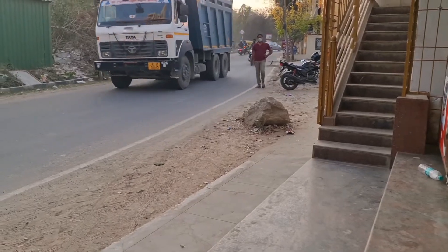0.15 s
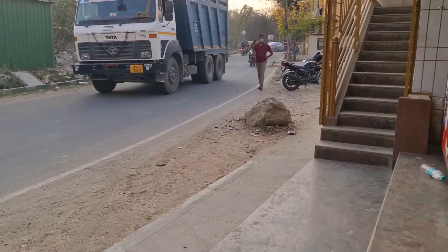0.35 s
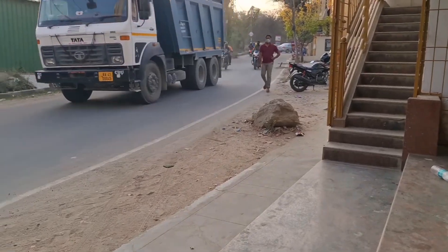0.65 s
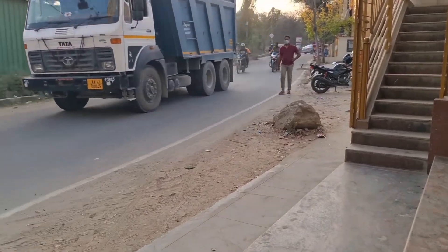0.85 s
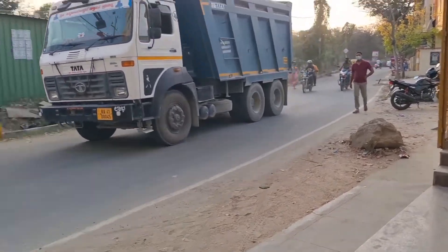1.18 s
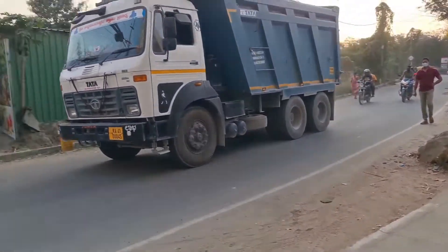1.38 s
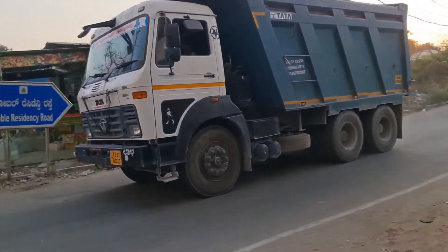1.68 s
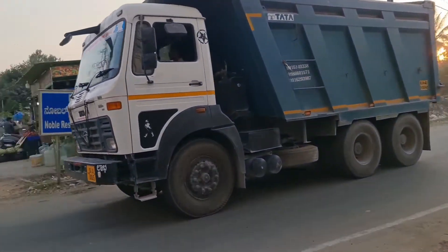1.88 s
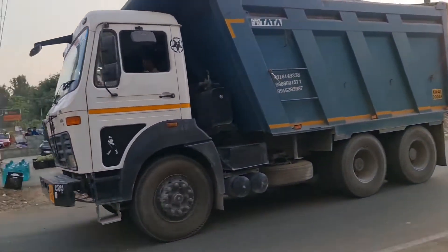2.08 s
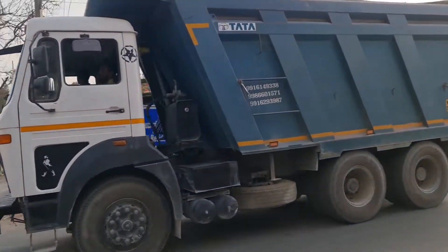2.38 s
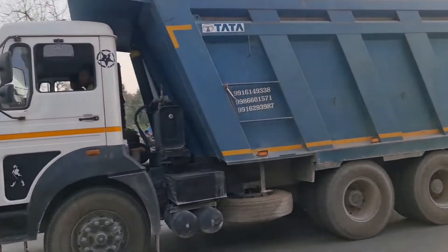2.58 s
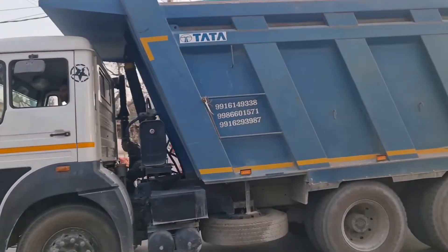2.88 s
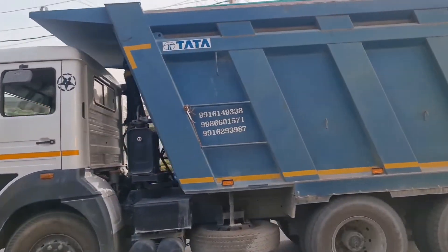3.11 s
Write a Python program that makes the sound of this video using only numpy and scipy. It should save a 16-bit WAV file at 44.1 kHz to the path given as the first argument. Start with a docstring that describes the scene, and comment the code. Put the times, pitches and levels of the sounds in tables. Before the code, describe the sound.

A heavy diesel truck rumbles and clatters over steady traffic, with faint chassis squeaks and a brief distant horn at the start. Air puffs at about 0.3 seconds, and the truck gives one short toot at 0.7. As the engine slows, the brakes rub and whistle thinly, then squeal in loud, wavering, echoing swells from 1.3 seconds until the end, just past 3. A faint gear whine joins around 2.2.

```python
"""A diesel tipper truck rolls up along a busy road, its firings booming and clattering over the traffic.
The chassis squeaks, a far horn sounds and a valve lets out a puff of air. The truck comes off the
throttle and the two diaphragms of its horn give one short toot. As it slows, the brake linings rub and
whistle thinly; then stick-slip friction sets the drums squealing in long wavering swells, which the
house fronts reflect. A faint whine from the drive joins in towards the end."""
import sys
import numpy as np
from scipy import signal
from scipy.fft import rfft, irfft, next_fast_len
from scipy.io import wavfile
from scipy.ndimage import map_coordinates

SR = 44100
rng = np.random.default_rng(int(sys.argv[2]) if len(sys.argv) > 2 else 0)


def inscribe(sig):
    """Save sig as 16-bit PCM at rate SR to the path in sys.argv[1].

    A 1-D sig is mono; a 2-D sig holds one channel per row.
    Samples are clipped to [-1, 1] before scaling.
    """
    pcm = np.round(np.clip(np.atleast_2d(sig).T, -1, 1) * 32767)
    wavfile.write(sys.argv[1], SR, pcm.astype(np.int16))


N = 143325

# Engine speed. Each row: time in seconds, firing rate in Hz.
FIRING_RATE = [(0, 80), (.25, 79.47), (.5, 85), (.68, 84.1), (1.25, 79.74), (1.6, 75.66), (2.0, 72.85),
               (2.5, 65.44), (2.9, 62.36), (3.25, 59.6)]
# Exhaust boom. Each row: multiple of the firing rate, relative level in dB.
BOOM_ORDERS = [(.5, -28), (1, -1.5), (1.5, -11), (2, -12), (3, -14), (4, -24)]
# Exhaust boom, engine body and diesel clatter. Each row: time in seconds, relative level in dB.
BOOM_LEVEL = [(0, -16.5), (.1, -18), (.22, -31.5), (.3, -22.5), (.39, -25.5), (.49, -23), (.66, -21.5),
              (.72, -41), (.92, -35), (.98, -27), (1.07, -37), (1.26, -25), (1.4, -40), (1.47, -33.5),
              (1.63, -28.5), (1.75, -24.5), (1.86, -28), (2.0, -21), (2.1, -27), (2.28, -27.5), (2.43, -30),
              (2.53, -23.5), (2.66, -25.5), (2.81, -26.5), (2.89, -21), (3.05, -27), (3.15, -30.5),
              (3.25, -26)]
BODY_LEVEL = [(0, -27), (.22, -27), (.32, -25), (.6, -25.5), (.74, -38), (1.1, -33.5), (1.65, -32.5),
              (2.1, -33), (2.5, -31), (2.9, -31), (3.25, -31.5)]
CLATTER_LEVEL = [(0, -24), (.25, -28), (.5, -29), (.68, -26), (.95, -38.5), (1.3, -31), (1.7, -34),
                 (2.0, -30), (2.2, -36), (2.6, -37), (3.25, -37.5)]
# Noise of the engine body, clatter and traffic. Each row: frequency in Hz, relative level in dB.
BODY_SPECTRUM = [(20, -32), (32, -11), (48, -1), (70, 0), (125, 0), (240, -5), (350, -11.5), (520, -15.5),
                 (900, -49)]
CLATTER_SPECTRUM = [(210, -8), (350, -0.5), (402, -15), (734, -5.5), (1170, -9), (1260, -9.5), (1640, -9.5),
                    (2680, -11.5), (4680, -19.5), (4900, -19.5), (7100, -22), (8810, -52), (14000, -42)]
TRAFFIC_SPECTRUM = [(22, -14), (55, 0.5), (200, -10.5), (500, -13.5), (800, -8.5), (1500, -11), (4000, -43),
                    (10000, -27.5), (16000, -50)]
# Chassis squeaks and the far horn. Each row: start and release in seconds, pitch in Hz, level in dB.
SQUEAKS = [(0, .09, 10750, -50), (.04, .15, 4600, -45), (.59, .67, 4570, -42)]
FAR_HORN = (.07, .18, 376, -30)
# Escaping air. One row: start and release in seconds, level in dB.
PUFF = (0.332, 0.5, -28)
# Hiss of air. Each row: frequency in Hz, relative level in dB.
AIR_SPECTRUM = [(400, -7), (1200, 5.5), (1800, 1), (3000, 1), (5000, -4), (8000, -6), (12000, -19.5),
                (16000, -33)]
# Horn diaphragms. Each row: pitch in Hz, relative level in dB.
HORN_NOTES = [(346, -21.5), (419, -24.5)]
# The horn's steady colour and opening overshoot. Each row: frequency in Hz, gain in dB.
HORN_COLOUR = [(340, -1.5), (700, -5), (850, 0), (1050, -2.5), (1260, 0), (1400, -10), (1720, -2),
               (2100, -12), (2500, -11), (3000, -9), (4200, -21), (5500, -12.5), (7400, -12.5),
               (9000, -25.5), (12000, -18.5), (16000, -37)]
HORN_BARK = [(700, -21), (1000, 9), (1350, 8.5), (1800, -12), (3000, -4), (4200, -8), (5500, -32)]
# Rise and 60 dB decay of the horn's partials. Each row: frequency in Hz, duration in seconds.
HORN_ATTACK = [(340, .06), (430, .055), (700, .022), (1200, .013), (3000, .013), (7000, .028)]
HORN_T60 = [(340, 0.38), (430, 0.26), (700, 0.087), (1700, 0.28), (3000, 0.095), (12000, 0.12)]
# Rub and whistle of the linings. Each row: time in seconds, relative level in dB.
RUB_LEVEL = [(0, -76), (.7, -49), (.82, -37.5), (.95, -41), (1.0, -48), (1.08, -38.5), (1.17, -41),
             (1.23, -50), (1.4, -36), (1.56, -45), (1.6, -34), (1.92, -35), (2.15, -49), (2.35, -43),
             (2.9, -58), (3.25, -48)]
WHISTLE_LEVEL = [(0.98, -62), (1.04, -45), (1.23, -43.5), (1.42, -49), (1.54, -41), (1.57, -51),
                 (1.85, -32.5), (1.88, -62), (1.98, -47), (2.06, -36.5), (2.35, -42), (2.41, -34.5),
                 (2.91, -34.5), (2.98, -29.5), (3.0, -35.5), (3.16, -48), (3.23, -33), (3.25, -45)]
# The linings' rub, sizzle and whistling modes. Each row: frequency in Hz, relative level in dB.
RUB_SPECTRUM = [(1000, -6), (2500, -3), (4000, -2), (6500, -1), (8500, -9), (10200, -15.5), (12000, -9),
                (16000, -43)]
SIZZLE_SPECTRUM = [(9000, -21), (13000, -18), (14400, 1), (15400, -5), (16000, -5)]
WHISTLE_MODES = [(11730, -13.5), (13200, -6), (14420, -0.5), (14750, -8), (15600, -2)]
# Drum squeal. Each row: time in seconds, pitch in Hz.
SQUEAL_PITCH = [(1.05, 1280), (1.25, 1282), (1.33, 1284), (1.39, 1238), (1.55, 1250), (1.66, 1236),
                (1.73, 1207), (1.79, 1208), (1.812, 1319), (1.84, 1273), (1.9, 1197), (1.98, 1166),
                (2.05, 1215), (2.11, 1184), (2.21, 1245), (2.255, 1196), (2.33, 1194), (2.405, 1235),
                (2.44, 1298), (2.55, 1278), (2.65, 1201), (2.72, 1177), (2.78, 1178), (2.83, 1265),
                (2.99, 1260), (3.025, 1217), (3.055, 1195), (3.15, 1200), (3.25, 1282)]
# Its swells. Each row: time in seconds, relative levels in dB of fundamental, octave and overtones.
SQUEAL_LEVELS = [(1.04, -39, -56, -59), (1.09, -35, -59, -59), (1.14, -29.5, -36, -70),
                 (1.17, -34, -45, -35), (1.21, -34, -69, -63), (1.24, -31.5, -42, -52),
                 (1.29, -18.5, -39.5, -38.5), (1.4, -15, -19.5, -31), (1.51, -31.5, -50, -35),
                 (1.53, -21.5, -29, -36.5), (1.57, -34, -43, -40.5), (1.69, -16, -23, -32),
                 (1.72, -18, -60, -38), (1.75, -16.5, -18.5, -28), (1.79, -20, -38.5, -40),
                 (1.85, -18, -23, -28.5), (2.0, -19, -36, -36), (2.04, -23, -25, -32),
                 (2.13, -44, -95, -70), (2.17, -38.5, -41, -61), (2.21, -36, -93, -37),
                 (2.22, -37.5, -40, -61), (2.24, -16.5, -21.5, -32), (2.39, -15, -26, -32),
                 (2.42, -18.5, -47, -35.5), (2.52, -38.5, -49, -71), (2.57, -15, -28.5, -33.5),
                 (2.65, -24.5, -32.5, -32.5), (2.76, -17, -44, -49), (2.79, -14, -22.5, -33.5),
                 (2.84, -29.5, -55, -39.5), (2.9, -43, -47, -61), (2.98, -82, -56, -57),
                 (3.01, -11.5, -58, -59), (3.02, -10.5, -30.5, -32), (3.1, -18.5, -42, -35.5),
                 (3.16, -14, -21.5, -31.5), (3.25, -18.5, -60, -33.5)]
# Its overtones. Each row: harmonic number, relative level in dB.
SQUEAL_OVERTONES = [(3, -5), (4, -4.5), (5, -5.5), (6, -13.5), (7, -16), (8, -19.5), (9, -18)]
# Gear whine. Each row: time in seconds, pitch in Hz, level in dB.
WHINE = [(1.9, 807, -66), (2.22, 762, -38.5), (2.45, 780, -48.5), (2.56, 803, -35), (2.66, 788, -40),
         (2.76, 742.5, -37.5), (3.05, 741.5, -37), (3.25, 744, -49)]
# Likeness of left and right noise. Each row: frequency in Hz, correlation from -1 to 1.
COHERENCE = [(60, 1), (125, 0.93), (250, 0.82), (600, -0.14), (1500, 0.039), (4000, -0.24), (10000, -0.039)]
# Street reverberation. Each row: frequency in Hz, 60 dB decay time in seconds.
STREET_T60 = [(200, 1), (1200, 0.49), (4000, 0.3), (14000, 0.31)]
# Echoes off the house fronts. Each row: delay in seconds, gain in dB.
WALL_ECHOES = [(.021, -8), (.047, -7), (.083, -21)]

TOP_HZ = 15850


def amp(db):
    """Decibels to amplitude ratio."""
    return 10 ** (np.asarray(db) / 20)


def unit(x):
    """Normalisation to rms 1."""
    return x / np.sqrt(np.mean(x ** 2) + 1e-20)


def clock():
    """Sample times in seconds."""
    return np.arange(N) / SR


def along(points, hz):
    """Interpolation on a logarithmic frequency axis."""
    f, v = np.transpose(points)
    return np.interp(np.log(hz + 1), np.log(f + 1), v)


def curves(rows):
    """Linear interpolation in time, one curve for each later column."""
    times, *columns = np.transpose(rows)
    return [np.interp(clock(), times, column) for column in columns]


def wobble(rate):
    """Smooth random modulation, rate knots a second."""
    return map_coordinates(rng.standard_normal(4096), [clock() * rate], mode="mirror")


def turning(hz):
    """Phase as the integral of frequency, from a random start."""
    return 2 * np.pi * (np.cumsum(hz) / SR + rng.random())


def ramp(on, attack):
    """Linear rise from 0 to 1."""
    return np.clip((clock() - on) / attack, 0, 1)


def gate(on, off, attack, t60):
    """Linear attack, hold and exponential decay."""
    return ramp(on, attack) * amp(-60 * np.maximum(clock() - off, 0) / t60)


def filtered(x, response):
    """Filtering as multiplication of the spectrum."""
    size = next_fast_len(N + SR // 4)
    return irfft(rfft(x, size) * response(np.fft.rfftfreq(size, 1 / SR)), size)[..., :N]


def rush(spectrum):
    """Coloured stereo noise; the ratio of mid to side sets its coherence."""
    def response(hz):
        angle = np.arccos(np.clip(along(COHERENCE, hz), -1, 1)) / 2
        return amp(along(spectrum, hz)) * [np.cos(angle), np.sin(angle)]
    mid, side = filtered(rng.standard_normal((2, N)), response)
    return np.array([mid + side, mid - side]) / np.std(mid)


def tone(phase, spread=0):
    """A sinusoid of rms 1, left and right spread radians apart."""
    return np.sqrt(2) * np.array([np.sin(phase + spread / 2), np.sin(phase - spread / 2)])


def raspy(phase, rough, rate):
    """Random modulation gives a fluttering partial noisy sidebands, different on each side."""
    skirt = np.array([wobble(rate) * np.sin(phase) + wobble(rate) * np.cos(phase) for _ in "LR"])
    flutter = amp([1.5 * wobble(22) for _ in "LR"])
    return (flutter * tone(phase, spread=1.23) + rough * skirt) / np.sqrt(1 + rough ** 2)


def street(x, wet_db):
    """Reverberation: road and house fronts scatter a tail that lasts longest in the bass."""
    hz, t, noise = signal.stft(rng.standard_normal((2, SR // 2)), SR, nperseg=256)
    decay = amp(-60 * t / along(STREET_T60, hz)[:, None])
    tail = signal.istft(noise * decay, SR, nperseg=256)[1]
    tail = np.pad(tail / np.linalg.norm(tail[0]), ((0, 0), (300, 0)))
    return x + amp(wet_db) * signal.fftconvolve(x, tail, axes=1)[:, :N]


def engine():
    """Periodic excitation: firings drive the exhaust's partials and modulate body noise and clatter."""
    phase = turning(curves(FIRING_RATE)[0] * (1 + 0.01195 * wobble(14)))
    boom = sum(amp(db + 2.6 * wobble(13)) * tone(k * phase + 2 * np.pi * rng.random(), spread=0.28)
               for k, db in BOOM_ORDERS)
    boom *= amp(curves(BOOM_LEVEL)[0] - 2)
    body = unit(rush(BODY_SPECTRUM) * (1 + .5 * np.cos(phase)))
    body *= amp(curves(BODY_LEVEL)[0])
    knocks = np.maximum(1 + 0.17 * np.cos(phase) * amp(3 * wobble(76)), 0)
    clatter = unit(rush(CLATTER_SPECTRUM) * knocks)
    clatter *= amp(curves(CLATTER_LEVEL)[0] + 1.4 * wobble(10))
    return pan(boom + body, left_db=-2) + clatter


def pan(x, left_db):
    """A level difference between the ears places a sound to one side."""
    return x * amp([[left_db / 2], [-left_db / 2]])


def traffic():
    """Incoherent sources along the road merge into a nearly steady wash."""
    return amp(-38 + wobble(4.22)) * rush(TRAFFIC_SPECTRUM)


def chassis_squeaks():
    """Brief narrow-band vibrations: the chassis creaks as the truck rolls up."""
    return sum(amp(db) * gate(on, off, attack=.02, t60=.1) * raspy(turning(hz), rough=1.2, rate=130)
               for on, off, hz, db in SQUEAKS)


def far_horn():
    """A harmonic series of three partials, the second strongest."""
    on, off, hz, db = FAR_HORN
    phase = turning(hz * (1 + 0.0048 * wobble(60)))
    octave = raspy(2 * phase, rough=0.52, rate=74)
    odd = amp(-9) * (tone(phase) + tone(3 * phase, spread=1.5))
    return street(amp(db) * gate(on, off, attack=.04, t60=.25) * (octave + odd), wet_db=-20)


def air_puff():
    """Turbulence: air escaping from a valve makes a short broadband hiss."""
    on, off, db = PUFF
    return amp(db) * gate(on, off, attack=0.059, t60=.22) * rush(AIR_SPECTRUM)


def horn():
    """Two diaphragms settle on pitch after a rough transient; their fundamentals rise slowly and linger."""
    on, off, hum_s = .694, .762, .044  # the fundamentals are held hum_s longer
    age = np.maximum(clock() - on, 0)
    settling = np.exp(-age / 0.01963)
    bark = np.exp(-(age / 0.027) ** 2)
    buzz = np.zeros((2, N))
    for hz, db in HORN_NOTES:
        jitter = (0.004 + .03 * settling) * wobble(450)
        phase = turning(hz * (1 + 0.016 * settling + jitter))
        for k in range(1, int(TOP_HZ / hz)):
            shape = gate(on, off + hum_s * (k == 1), along(HORN_ATTACK, k * hz), along(HORN_T60, k * hz))
            overshoot = 1 + amp(along(HORN_BARK, k * hz)) * bark
            partial = tone(k * phase + 2 * np.pi * rng.random(), spread=min(k * 0.41, 1.6))
            buzz += amp(db + along(HORN_COLOUR, k * hz)) * shape * overshoot * partial
    rasp = amp(-27.5) * gate(on, off, attack=.014, t60=0.3) * rush(AIR_SPECTRUM)
    return street(buzz + rasp, wet_db=-9)


def lining_rub():
    """Sliding friction of linings on drums makes a grainy broadband noise."""
    return amp(curves(RUB_LEVEL)[0] + 1.6 * wobble(70)) * rush(RUB_SPECTRUM)


def lining_whistle():
    """Friction excites high modes of the linings, which twitter loosely, then lock into thin whistles."""
    level = amp(curves(WHISTLE_LEVEL)[0]) * ramp(WHISTLE_LEVEL[0][0], attack=0.035)
    locked = ramp(on=2.03, attack=.04)
    wander = .022 * (1 - locked) + .006 * locked  # drift as a share of the pitch
    modes = np.zeros((2, N))
    for hz, db in WHISTLE_MODES:
        flare_db = 5 * (wobble(12) - .5)
        phase = turning(hz * (1 + wander * wobble(18)))
        modes += amp(db + flare_db) * raspy(phase, rough=1.0, rate=190)
    sizzle = amp(-1.5 - 4.94 * locked) * rush(SIZZLE_SPECTRUM)
    whistle = level * (amp(-4 + 4.5 * locked) * modes + sizzle)
    return pan(street(whistle, wet_db=0), left_db=-2.5)


def drum_squeal():
    """Stick-slip oscillation: the drum sings as the shoes grip and slip, sagging where they bite hardest."""
    chatter = 0.29  # roughness from the shoes, stronger on each higher harmonic
    first_db, octave_db, high_db = curves(SQUEAL_LEVELS)
    phase = turning(curves(SQUEAL_PITCH)[0] * (1 + 0.00488 * wobble(260) + 0.00242 * wobble(40)))
    first = amp(first_db + 0.5) * raspy(phase, rough=chatter, rate=130)
    octave = amp(octave_db + 2) * raspy(2 * phase, rough=2 * chatter, rate=100)
    overtones = sum(raspy(k * phase, rough=1.02 * k * chatter, rate=60 * k) * amp(db + 2 * wobble(30.03))
                    for k, db in SQUEAL_OVERTONES)
    onset = ramp(SQUEAL_LEVELS[0][0], attack=0.037)
    low = onset * (first + pan(octave, left_db=4.5))
    high = onset * amp(high_db + 2.5) * overtones
    return street(wall_echoes(low), wet_db=-13) + street(high, wet_db=-4)


def wall_echoes(x):
    """Interference: echo paths drift as the truck moves, so they beat against the direct sound."""
    t = clock()
    def echo(side, delay):
        return np.interp(t - delay * (1 + 0.01137 * wobble(3)), t, side, left=0)
    return x + np.array([sum(amp(db) * echo(side, delay) for delay, db in WALL_ECHOES) for side in x])


def gear_whine():
    """Meshing gears in the drive radiate one rough, wavering partial."""
    hz, db = curves(WHINE)
    return amp(db) * raspy(turning(hz), rough=0.87, rate=60)


def scene():
    """Superposition of the truck and the sounds of the road."""
    approach = engine() + traffic() + chassis_squeaks() + far_horn() + air_puff() + horn()
    return approach + lining_rub() + lining_whistle() + drum_squeal() + gear_whine()


def record(dry):
    """Soft saturation rounds the highest peaks; a low-pass cut limits the band."""
    ceiling = .97
    rounded = dry / (1 + np.abs(dry / ceiling) ** 8) ** (1 / 8)
    return filtered(rounded, lambda hz: hz < TOP_HZ)


dry = scene()
out = record(dry)
inscribe(out)
```